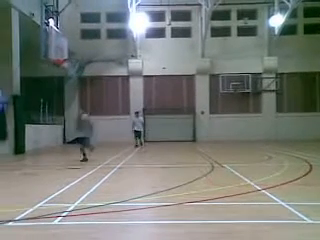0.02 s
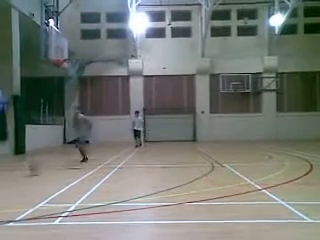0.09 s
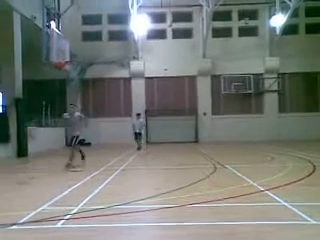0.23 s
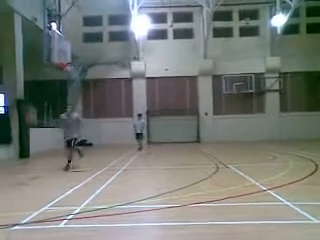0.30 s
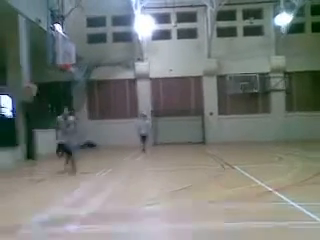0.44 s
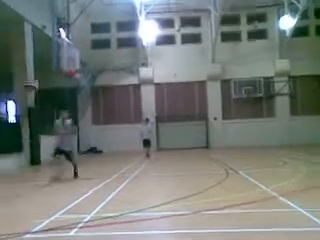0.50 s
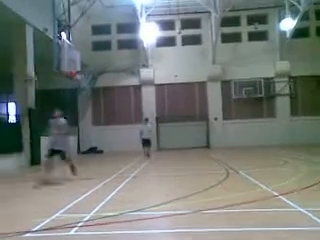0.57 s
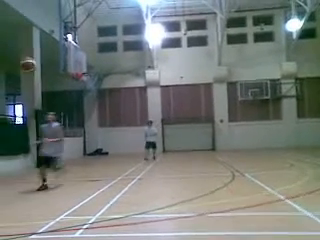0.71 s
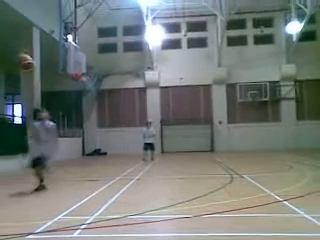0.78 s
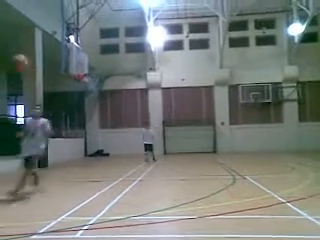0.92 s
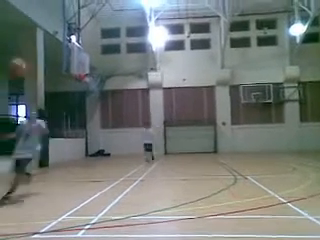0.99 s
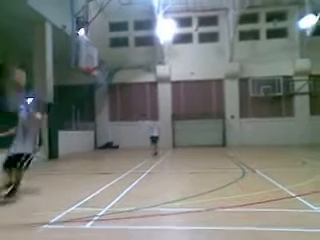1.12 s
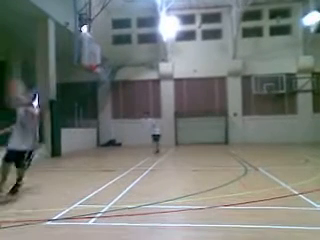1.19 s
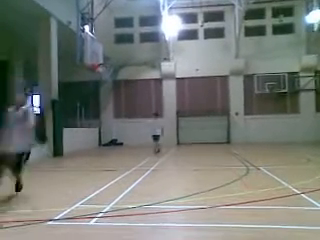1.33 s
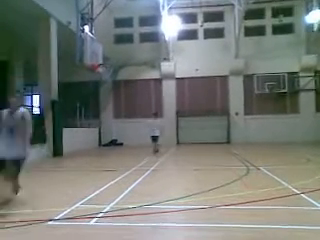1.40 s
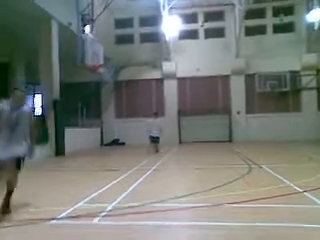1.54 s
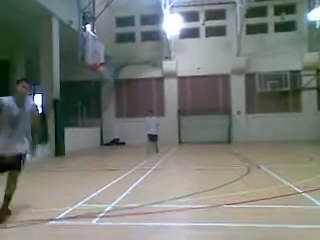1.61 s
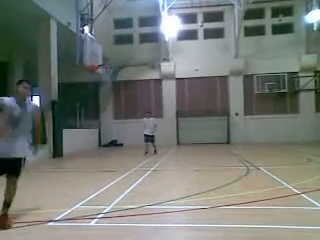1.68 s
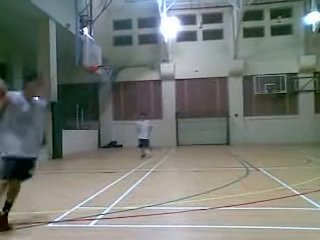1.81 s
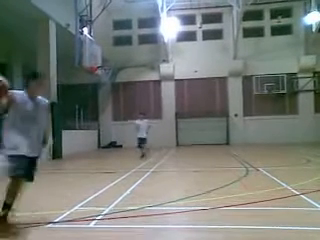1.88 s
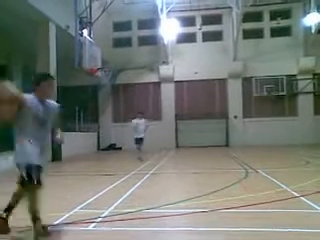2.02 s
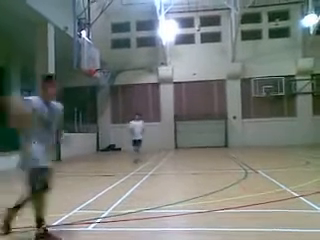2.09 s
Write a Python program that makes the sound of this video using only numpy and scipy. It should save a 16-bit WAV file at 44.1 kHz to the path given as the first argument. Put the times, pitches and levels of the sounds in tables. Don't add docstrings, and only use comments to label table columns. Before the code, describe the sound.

A basketball bounces on a hard gym floor at 0.2 s, a rubber slap with a deep booming thump. A runner's shoes slap lightly at 0.75 s, thud at 1.1 s and slap loudest at 1.43 s. A softer bounce follows at 1.53 s, then a very short high squeak at 1.83 s. Faint distant scuffs and chirps, ventilation hum, long hall echo, compressed phone microphone.

```python
import sys
import numpy as np
from scipy import signal
from scipy.io import wavfile
from scipy.ndimage import uniform_filter1d

SR = 44100
rng = np.random.default_rng(int(sys.argv[2]) if len(sys.argv) > 2 else 0)


def level_to_linear(level):
    exponent = np.asarray(level, float) / 20
    return 10 ** exponent


def log_audio(samples):
    frames = np.atleast_2d(samples).T
    limited = np.clip(frames, -1, 1)
    pcm = np.round(limited * 32767).astype(np.int16)
    wavfile.write(sys.argv[1], SR, pcm)


N = 97020

# [t/s, slap level/dB, thump level/dB, thump f/Hz, near-wall delay/s]
BOUNCES = [
    (.209, -12.5, -2.5, 101.2, .0122),
    (1.531, -14.5, -6, 104.6, .0178),
]
# [f/Hz, level/dB, t60/s]
BALL_MODES = [(234.4, -13.5, 0.058), (312, -23.5, 0.032), (410.6, -23, .04), (616, -30, 0.084),
              (690, -25.5, .06), (823, -23.5, 0.084), (1002, -32.5, 0.12), (1044, -26.5, 0.12),
              (1163, -26.5, .05), (1490, -31, 0.035), (2000, -28, 0.023)]
# [t/s, slap level/dB, thud level/dB, knock level/dB, knock f/Hz]
FOOTFALLS = [
    (0.7544, -29, -41, -38, 2000),
    (.7757, -17, -36, -22.5, 2000),
    (0.7885, -40, -37, -33, 1133),
    (1.102, -31, -19.5, -27, 443),
    (1.1155, -30.5, -41, -30.5, 920),
    (1.4121, -28.5, -48, -41.5, 1540),
    (1.436, -14, -8, -15.5, 978),
    (1.453, -45, -27.5, -24, 1150),
]
# [t/s, stick-slip f/Hz, level/dB]
SQUEAK = [
    (1.834, 2560, -39),
    (1.8362, 2712, -21.5),
    (1.84, 2950, -26),
    (1.847, 3116, -24.5),
    (1.854, 3199, -22),
    (1.861, 3120, -30.5),
    (1.871, 2960, -31.5),
    (1.887, 2990, -52.5),
]
SQUEAK_HARMONICS_DB = [-1.5, 0.5, -4]
# [f/Hz, level/dB]
SQUEAK_PATCH = [(2620, -6), (3900, -12), (5200, -15), (7900, -14.5)]
# [t/s, length/s, f/Hz, level/dB]
FAR_CHIRPS = [
    (.13, .045, 2700, -47),
    (1.3, .02, 2620, -48),
    (1.365, .04, 2650, -48),
]
# [t/s, length/s, f/Hz, level/dB]
FAR_SCUFFS = [
    (0.048, .1, 5820, -46),
    (1.18, 0.12, 5980, -48.5),
]
# [f/Hz, level/dB, t60/s]
HALL = [(46.3, -12.5, 1.46), (108, -31.5, 1.08), (203.6, -13.5, 1.05), (401, -18, 0.6), (747, -13.5, 1.33),
        (1730, -18, 2.6), (2947, -32.5, 4.15), (5090, -16, 1.86), (9000, -53, 2.7)]
# [delay/s, level/dB]
FAR_WALLS = [(.038, -18), (.082, -30), (.15, -15)]
# [f/Hz, density/dB per Hz]
AIR = [(21, -40), (35, -1), (126, 0.5), (658, -12), (854, -10), (1310, -12.5), (2660, -18.5), (8280, -28),
       (10000, -67), (13000, -87), (22000, -120)]
# [f/Hz, step/dB re block mid and treble level]
ROUNDING_STEP = [(100, -15.5), (1500, -8.5), (3000, -2.5), (4200, 0), (6000, 2), (8000, 2.5), (10500, 6)]


def band(x, hz, octaves):
    edges_hz = np.clip([hz * 2 ** (-octaves / 2), hz * 2 ** (octaves / 2)], 10, .45 * SR)
    return signal.sosfilt(signal.butter(2, edges_hz, "bandpass", fs=SR, output="sos"), x)


def unit(x):
    return x / np.sqrt(np.mean(x ** 2))


def since(t_s):
    return np.maximum(np.arange(N) / SR - t_s, 0)


def noise_band(hz, octaves):
    return unit(band(rng.standard_normal(N), hz, octaves))


def walk(rate_hz):
    hold = int(SR / rate_hz)
    held = np.repeat(rng.standard_normal(N // hold + 1), hold)
    return unit(uniform_filter1d(held, hold)[:N])


def ring(t_s, hz, t60_s, attack_s):
    u = since(t_s)
    return np.sin(2 * np.pi * hz * u) * (1 - np.exp(-u / attack_s)) * level_to_linear(-60 * u / t60_s)


def slap(t_s, hz, octaves, t60_s):
    first_touch = 1.6
    u = since(t_s)
    push = rng.standard_normal(N) * (u > 0) * level_to_linear(-60 * u / t60_s)
    push[int(t_s * SR) + 2] += first_touch * np.sqrt(SR / hz)
    return band(push, hz, octaves) * np.sqrt(SR / (2 * hz * octaves))


def ball():
    scatter_db, thump_lag_s, thump_rise_s, wall_db = 1.5, .0022, .009, -9.5
    out = 0
    for t_s, slap_db, thump_db, thump_hz, wall_s in BOUNCES:
        crack = slap(t_s, 6000, 1.5, .014)
        crack = crack + slap(t_s, 1500, 1.6, .025)
        crack = crack + level_to_linear(-6) * slap(t_s, 500, 2.4, .065)
        upper = level_to_linear(slap_db) * crack
        for hz, db, t60_s in BALL_MODES:
            upper = upper + level_to_linear(db + scatter_db * rng.standard_normal()) * ring(t_s, hz, t60_s, .00067)
        thump = -level_to_linear(thump_db + 13) * ring(t_s + thump_lag_s, thump_hz, .04, thump_rise_s)
        out = out + thump + upper + level_to_linear(wall_db) * np.roll(upper, int(wall_s * SR))
    return out


def footfalls():
    thud_hz = 122.4
    out = 0
    for t_s, slap_db, thud_db, knock_db, knock_hz in FOOTFALLS:
        bright = slap(t_s, 6300, 1.5, .0081)
        knock = slap(t_s, knock_hz, .97, .027) + level_to_linear(-4) * slap(t_s, 1.7 * knock_hz, .88, .024)
        thud = ring(t_s, thud_hz, .053, .00067)
        thud = thud + level_to_linear(-4) * ring(t_s + .0014, 2.3 * thud_hz, .028, .00033)
        out = out + level_to_linear(slap_db) * bright + level_to_linear(knock_db) * knock - level_to_linear(thud_db) * thud
    return out


def squeak():
    jitter, rough_db, echo_s, echo_db = .022, 3.5, .021, -3
    t = np.arange(N) / SR
    t_s, f_hz, level_db = np.array(SQUEAK).T
    slip_hz = np.interp(t, t_s, f_hz) * (1 + jitter * walk(900))
    phase = 2 * np.pi * np.cumsum(slip_hz) / SR
    x = level_to_linear(-9.5) * noise_band(6300, .73)
    for k, db in enumerate(SQUEAK_HARMONICS_DB):
        x = x + level_to_linear(db + rough_db * walk(350)) * np.sin((k + 1) * phase)
    for hz, db in SQUEAK_PATCH:
        x = x + level_to_linear(db) * noise_band(hz, .18)
    x = x * level_to_linear(np.interp(t, t_s, level_db, -120, -120))
    return x + level_to_linear(echo_db) * np.roll(x, int(echo_s * SR))


def hump(t_s, length_s):
    return np.sin(np.pi * np.minimum(since(t_s) / length_s, 1))


def far_shoes():
    out = 0
    for t_s, length_s, hz, db in FAR_CHIRPS:
        tone = np.sin(2 * np.pi * hz * since(t_s))
        out = out + level_to_linear(db + 2.5 * walk(78.1)) * hump(t_s, length_s) * tone
    for t_s, length_s, hz, db in FAR_SCUFFS:
        out = out + level_to_linear(db + 3.6 * walk(87)) * hump(t_s, length_s) * noise_band(hz, .91)
    return out


def hall(x):
    build_s, tail_db = .019, 11
    u = since(0)
    tail = 0
    for hz, db, t60_s in HALL:
        tail = tail + level_to_linear(db - 33.5 - 60 * u / t60_s) * band(rng.standard_normal(N), hz, 1.327)
    tail = level_to_linear(tail_db) * tail * (1 - np.exp(-(u / build_s) ** 2))
    out = signal.fftconvolve(x, tail)[:N]
    dull = band(x, 450, 4.58)
    for delay_s, db in FAR_WALLS:
        out = out + level_to_linear(db) * np.roll(dull, int(delay_s * SR))
    return out


def air():
    level_db = -38.5
    f_hz, density_db = np.array(AIR).T
    swell = walk(3.6)
    out = 0
    for hz in 25 * 2 ** np.arange(0, 8.8, .5):
        db = np.interp(np.log(hz), np.log(f_hz), density_db) + .27 * swell + .4 * walk(8.25)
        out = out + level_to_linear(db) * band(rng.standard_normal(N), hz, .53)
    return level_to_linear(level_db) * unit(out)


def scene():
    feet_send_db = -4
    feet = footfalls()
    rest = ball() + squeak() + far_shoes()
    return (feet + rest + hall(level_to_linear(feet_send_db) * feet + rest) + air())[None]


def round_blocks(x, extra_db, size):
    scatter_db = 3.5
    n, k = np.arange(2 * size), np.arange(size // 2)
    window = np.sin(np.pi * (n + .5) / (2 * size))
    cosines = np.cos(np.pi / size * np.outer(k + .5, n + .5 + size / 2))
    basis = window * cosines * np.sqrt(2 / size)
    blocks = N // size + 2
    idx = np.arange(blocks)[:, None] * size + n
    lines = np.pad(x, (size, 3 * size))[idx] @ basis.T
    hz = (k + .5) * SR / (2 * size)
    f_hz, step_db = np.array(ROUNDING_STEP).T
    loud = np.sqrt(np.mean(lines[:, size // 24:] ** 2, axis=1, keepdims=True))
    scatter = scatter_db * np.repeat(rng.standard_normal((blocks, 32)), size // 64, axis=1)
    step = loud * level_to_linear(np.interp(np.log(hz), np.log(f_hz), step_db) + extra_db + scatter) + 1e-9
    rounded = np.sign(lines) * np.floor(np.abs(lines) / step + .4) * step
    out = np.zeros((blocks + 3) * size)
    np.add.at(out, idx, rounded @ basis)
    return out[size:size + N]


def camera_rounding(x):
    attack_ratio, short_step_db = 5, -1
    power = uniform_filter1d(band(x, 6000, 1.5) ** 2, size=128)
    before = np.roll(uniform_filter1d(power, size=768), 448)
    attack = 1. * (power > attack_ratio * before)
    near = 1. * (uniform_filter1d(attack, size=700) > 1e-6)
    short = np.roll(uniform_filter1d(near, size=200), 150)
    return round_blocks(short * x, short_step_db, 128) + round_blocks((1 - short) * x, 0., 1024)


def low_pass(x):
    return signal.sosfilt(signal.butter(12, 11280, fs=SR, output="sos"), x)


def record(dry):
    dip_hz, dip_db, top_hz = 3830, -5.5, 10200
    x = dry - (1 - level_to_linear(dip_db)) * band(dry, dip_hz, .78)
    x = np.tanh(1.055 * x) / 1.148
    x = signal.sosfilt(signal.ellip(8, .2, 70, top_hz, fs=SR, output="sos"), x)
    mix = camera_rounding(x[0])[None]
    return low_pass(mix)


dry = scene()
out = record(dry)
log_audio(out)
```